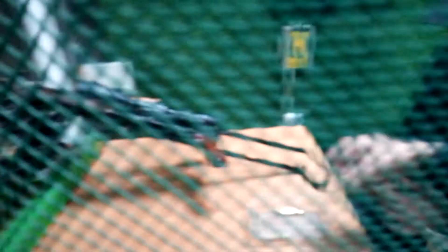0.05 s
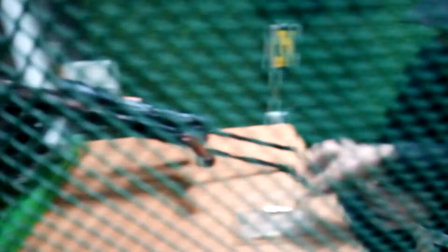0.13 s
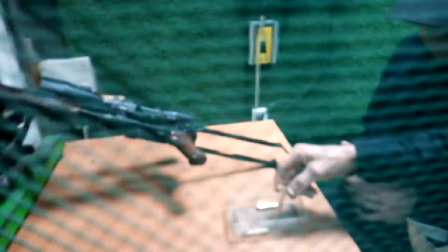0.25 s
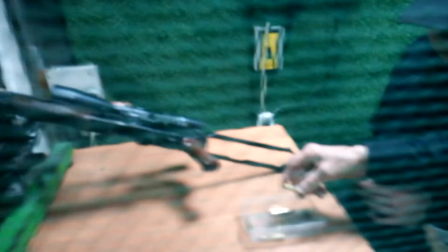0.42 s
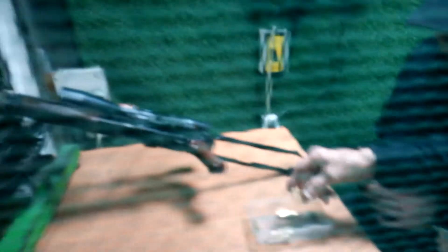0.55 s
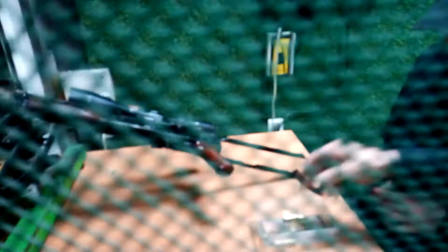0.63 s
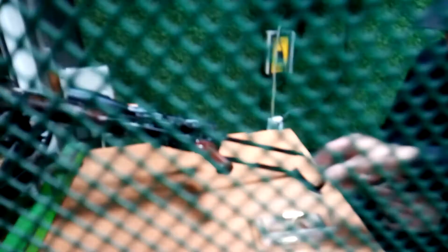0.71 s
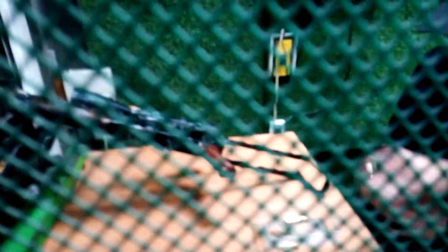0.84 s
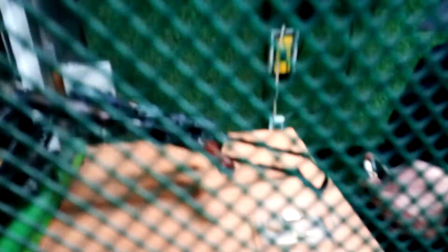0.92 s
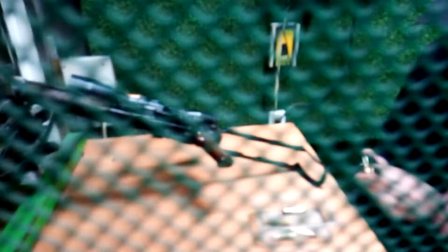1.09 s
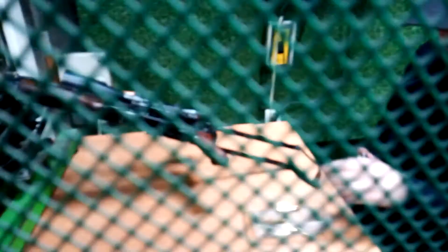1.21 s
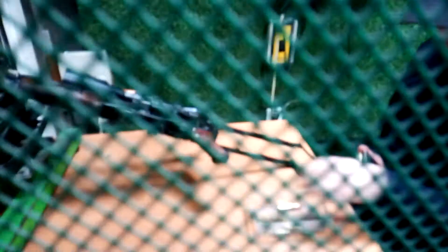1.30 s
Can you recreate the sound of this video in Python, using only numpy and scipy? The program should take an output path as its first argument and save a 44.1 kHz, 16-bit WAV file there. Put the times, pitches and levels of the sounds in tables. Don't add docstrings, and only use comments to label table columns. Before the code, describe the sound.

Small brass cartridge cases clink and rattle as a hand gathers them from a plastic tray

```python
import sys
import numpy as np
from scipy import signal
from scipy.fft import rfft, irfft
from scipy.io import wavfile

SR = 44100
rng = np.random.default_rng(int(sys.argv[2]) if len(sys.argv) > 2 else 0)


def volts(x):
    e = np.asarray(x, float) / 20
    return 10 ** e


def master_out(mix):
    frames = np.transpose(np.atleast_2d(mix))
    ceiling = np.clip(frames, -1, 1)
    pcm = np.round(ceiling * 32767).astype(np.int16)
    wavfile.write(sys.argv[1], SR, pcm)


N = 59535


def strikes(s, db):
    x = np.zeros(N)
    index = np.minimum((np.asarray(s) * SR).astype(int), N - 1)
    np.add.at(x, index, volts(db))
    return x


def ring(clicks, hz, t60_s):
    radius = volts(-60 / (t60_s * SR))
    w = 2 * np.pi * hz / SR
    return signal.lfilter([0, np.sin(w)], [1, -2 * radius * np.cos(w), radius ** 2], clicks + 1e-18)


CONTACT_S, SPREAD_DB, FIRST_TOUCH_DB = 0.0004, 3.5, -23.5


def body(s, db, modes):
    chance_db = SPREAD_DB * rng.standard_normal((len(s), 2, len(modes)))
    out = 0
    for k, (hz, level_db, t60_s) in enumerate(modes):
        first = strikes(s - CONTACT_S, db + level_db + FIRST_TOUCH_DB + chance_db[:, 0, k])
        second = strikes(s + CONTACT_S, db + level_db + chance_db[:, 1, k])
        out = out + (-1) ** k * ring(first + second, hz, t60_s)
    return out


# t/s, crack peak/dB, table level/dB, tray level/dB
KNOCKS = [(0.22,-6.5,-28,-19.5), (0.3417,-9,-34,-31.5), (0.4256,-16.5,-44.5,-33), (0.4506,-9.5,-25,-17.5),
          (.475,-27,-38,-34), (.5005,-19.5,-35.5,-28.5), (0.5107,-39,-39.5,-61), (0.5159,-18,-33,-47),
          (.537,-30,-60,-31.5), (0.5529,-26,-60,-47), (0.5864,-7,-29,-20.5), (0.594,-18,-29,-23),
          (0.594,-9,-34,-54), (.604,-18,-62,-52), (0.6452,-18,-34.5,-27), (.662,-30,-69,-57),
          (0.677,-25.5,-73,-37), (.690,-30,-67,-64), (0.7282,-18,-54,-41), (0.7347,-32,-40,-43),
          (0.737,-45,-45.5,-26), (.759,-36,-74,-70), (0.7726,-10.5,-26,-24.5), (.844,-25.5,-46,-53),
          (.864,-40,-50,-59), (.885,-27.5,-44,-37.5), (1.011,-18,-39,-33.5), (1.277,-51,-53,-47.5),
          (1.296,-48.5,-74,-54), (1.334,-33,-47.5,-40)]
# f/Hz, level/dB, t60/s
CRACK_MODES = [(2850, -19.5, 0.0024), (3606, -12, 0.0054), (4330, -8, 0.0055), (5600, -16.5, 0.016),
               (5660, -4.5, 0.0043), (6436, -3, 0.0054), (7330, -10.5, 0.0053), (9620, -14.5, 0.0052),
               (11700, -18.5, 0.0012), (14800, -21, 0.0041)]
# f/Hz, level/dB, t60/s
TRAY_MODES = [(1454, -13, 0.045), (1767, -0.5, 0.027), (1863, 4, 0.021), (1918, 6, 0.014),
              (2046, 4.5, 0.016), (2240, -5, 0.003), (2525, -13, 0.033)]
# f/Hz, level/dB, t60/s
TABLE_MODES = [(145, -23.5, 0.11), (330, -14.5, 0.066), (508.6, -5.5, 0.056), (543, -4, 0.019),
               (712.6, -7, 0.083), (883, -2.5, 0.048), (1032, -7.5, 0.042), (1270, -35, 0.019)]


def knocks():
    s, crack_db, table_db, tray_db = np.transpose(KNOCKS)
    crack = body(s, crack_db, CRACK_MODES)
    tray = body(s, tray_db, TRAY_MODES)
    return crack + tray + body(s, table_db, TABLE_MODES)


# t/s, level/dB
RIM_HITS = [
    (0.2205, -18.5),
    (0.3418, -20.5),
    (0.5015, -20.5),
    (0.5167, -22),
    (.596, -20.5),
    (0.7348, -19),
    (.738, -24),
]
# f/Hz, level/dB, t60/s
RIM_MODES = [(1937, -4, 0.014), (2062, -3, 0.02), (4050, -10, 0.026)]


def rim():
    s, db = np.transpose(RIM_HITS)
    return sum(ring(strikes(s, db + level_db), hz, t60_s) for hz, level_db, t60_s in RIM_MODES)


# t/s, f/Hz, level/dB, t60/s
SPOTS = [(.2205, 1035, -35.5, 0.035), (.2205, 1500, -33, 0.16), (.2205, 700, -41, 0.045),
         (.4256, 2010, -23.5, 0.016), (.5304, 7400, -26, 0.0092), (.5532, 7340, -20, .012),
         (.5582, 6000, -24.5, 0.026), (.8212, 5880, -21, 0.012), (.3417, 4230, -21.5, 0.014),
         (.2205, 308, -42.5, 0.32), (.2202, 6500, -10, .008), (.2205, 2185, -21.5, .03),
         (.587, 9700, -11.5, 0.0091), (.773, 6340, -13, 0.0083), (.451, 3040, -17.5, 0.014),
         (1.011, 6070, -24, 0.0096), (.451, 563, -30.5, 0.22), (.451, 1030, -47, 0.015),
         (.451, 1270, -26, 0.052), (.516, 990, -25, 0.024), (.587, 881, -30.5, 0.095),
         (.594, 1480, -48, 0.083), (.7349, 4310, -23, 0.019), (.738, 4260, -27.5, 0.012),
         (.773, 572, -34.5, 0.16), (.773, 883, -38, 0.076), (1.011, 494, -46.5, 0.22),
         (1.011, 696, -33, 0.024), (1.011, 880, -49, 0.24), (1.011, 1453, -37, 0.058),
         (1.011, 2525, -43.5, 0.077), (1.334, 2110, -34, 0.032)]


def spots():
    modes = rim()
    for k, (s, hz, db, t60_s) in enumerate(SPOTS):
        modes = modes + (-1) ** k * ring(strikes([s], db), hz, t60_s)
    low_cut = signal.butter(2, 300, "high", fs=SR, output="sos")
    return signal.sosfilt(low_cut, modes)


def rms_one(x):
    return x / np.sqrt(np.mean(x ** 2) + 1e-20)


def flutter(hz):
    r = np.exp(-2 * np.pi * hz / SR)
    return rms_one(signal.lfilter([1], [1, -2 * r, r * r], rng.standard_normal(N)))


def tumble():
    return 1 + 0.25 * flutter(hz=80)


def halo():
    return flutter(hz=450)


def swell(at_s, db, hz, t60_s, rise_s):
    t = np.maximum(np.arange(N) / SR - at_s, 0)
    decay = volts(db - 60 * np.minimum(t / t60_s, 3))
    return decay * (1 - np.exp(-t / rise_s)) * np.sin(2 * np.pi * hz * t)


# t/s, loss/dB
GRIPS = [(.489, 8), (0.5018, 8), (0.513, 3), (.539, 10), (0.5606, 9.5), (.577, 2), (0.607, 1), (0.733, 13),
         (.748, -6), (.800, 4.5), (0.81, 10), (.827, 4), (.853, 12.5)]
GRIP_S = 0.0015


def gripped(at_s):
    t = np.arange(N) / SR
    loss_db = np.zeros(N)
    for s, touch_db in GRIPS:
        if s > at_s + GRIP_S:
            loss_db += max(touch_db, 0) * np.clip((t - s) / GRIP_S, 0, 1)
    return volts(-loss_db)


# t/s, peak/dB, ring f/Hz, upper mode level/dB, t60/s
CLINKS = [(0.452,-27,8650,-31,0.79), (0.4903,-15.5,8675,-55,0.24), (.5095,-46,8700,-60,0.032),
          (0.532,-64,8490,-60,0.064), (0.557,-17,8550,-46,0.077), (0.596,-17,8660,-37,0.06),
          (.666,-31,8540,-56,0.042), (0.7282,-24.5,8600,-31.5,0.08), (0.7344,-23,8590,-35,0.055),
          (0.773,-17.5,8664,-24,0.24), (0.8211,-18,8540,-39,0.17), (.882,-33.5,8580,-69,0.035),
          (0.945,-31.5,8540,-80,0.011), (1.0853,-43.5,8520,-75,0.024), (1.265,-48,8420,-95,0.016),
          (1.278,-35,8300,-78,0.02), (1.334,-30.5,8740,-59,0.048)]
# t/s, peak/dB, ring f/Hz, t60/s
PARTNERS = [
    (.4903, -24, 8680, 0.065),
    (.531, -24, 8500, 0.094),
    (0.5575, -24, 8810, 0.054),
    (.597, -26, 8440, 0.13),
    (.7276, -17.5, 8410, 0.038),
    (.7731, -16.5, 8580, 0.083),
    (.7741, -27, 8200, .04),
    (0.8226, -18.5, 8580, 0.03),
    (.8209, -25, 8100, .03),
    (0.944, -42, 8640, 0.073),
]
UPPER_HZ, UPPER_SPLIT_HZ, UPPER_T60_S, UPPER_RISE_S = 14430, 70, 0.11, 1e-4
UPPER_FLOOR_DB = -58
RING_RISE_S = 0.00029
TICK_DB, TICK_TRAY_DB = -4.5, -22
HALO_SHARE, UPPER_HALO_SHARE = 0.16, 0.45


def clinks():
    s, db, _, _, _ = np.transpose(CLINKS)
    tick = body(s, db + TICK_DB, CRACK_MODES) + body(s, db + TICK_TRAY_DB, TRAY_MODES)
    first, second, upper = 0, 0, 0
    for at_s, peak_db, hz, upper_db, t60_s in CLINKS:
        grip = gripped(at_s)
        first = first + grip * swell(at_s, peak_db, hz, t60_s, RING_RISE_S)
        if upper_db > UPPER_FLOOR_DB:
            pair = swell(at_s, upper_db, UPPER_HZ, UPPER_T60_S, UPPER_RISE_S)
            pair += swell(at_s, upper_db - 4, UPPER_HZ + UPPER_SPLIT_HZ, UPPER_T60_S, UPPER_RISE_S)
            brief = swell(at_s, upper_db - 9, 14800, 0.03, UPPER_RISE_S)
            upper = upper + grip * (pair + brief)
    for partner_s, peak_db, hz, t60_s in PARTNERS:
        at_s = s[np.argmin(abs(s - partner_s))]
        second = second + gripped(at_s) * swell(at_s, peak_db, hz, t60_s, RING_RISE_S)
    upper = upper * (tumble() + UPPER_HALO_SHARE * halo())
    first = first * (tumble() + HALO_SHARE * halo())
    return tick + upper + first + second * tumble()


# t/s, peak/dB
TAPS = [
    (.780, -40),
    (.7935, -40),
    (.800, -43),
    (.8065, -44),
    (.8165, -43),
    (.822, -37),
    (.862, -43),
]
# t/s, peak/dB
TICKS = [(.4585, -27), (.496, -33), (.5304, -31), (.5442, -38), (.5582, -30), (.5645, -33), (.6057, -30),
         (.7372, -26), (.786, -35), (.7944, -31), (.832, -34), (.8384, -34), (.8515, -35)]


def settling():
    tap_s, tap_db = np.transpose(TAPS)
    tick_s, tick_db = np.transpose(TICKS)
    return body(tap_s, tap_db - 3, TRAY_MODES) + body(tick_s, tick_db, CRACK_MODES)


# start t/s, end t/s, level/dB
CHATTER = [
    (0.452, .58, -52),
    (0.599, .71, -44),
    (0.733, 0.774, -57),
    (0.778, 0.902, -45),
    (0.893, 1.0, -56.5),
]
CHATTER_PER_S, CHATTER_SPAN_S, CHATTER_FADE_DB_PER_S = 260, 0.2, 50
CHATTER_CRACK_DB, CHATTER_TABLE_DB = -3, -5


def chatter():
    out = 0
    count = int(CHATTER_PER_S * CHATTER_SPAN_S)
    for start_s, end_s, start_db in CHATTER:
        after_s = rng.uniform(0, CHATTER_SPAN_S, count)
        s = start_s + after_s
        db = start_db - CHATTER_FADE_DB_PER_S * after_s + rng.normal(0, 3, count)
        db = np.where(s < end_s, db, -200)
        out = out + body(s, db, TRAY_MODES)
        out = out + body(s, db + CHATTER_CRACK_DB, CRACK_MODES)
        out = out + body(s, db + CHATTER_TABLE_DB, TABLE_MODES)
    return out


# t/s, level/dB, f/Hz
THUDS = [
    (0.225, -30.5, 96),
    (0.36, -34.5, 93.8),
    (0.457, -31, 99.5),
    (.52, -34, 92),
    (0.59, -25.5, 98),
    (0.733, -41, 91.5),
    (0.788, -35.5, 102.5),
]


def thuds():
    return sum(swell(s, db, hz, t60_s=0.17, rise_s=0.025) for s, db, hz in THUDS)


def at_hz(points, hz, axis=1):
    p = np.array(points)
    return np.interp(np.log(np.maximum(hz, 1)), np.log(p[:, 0]), p[:, axis])


def rise(x, rise_s):
    r = np.exp(-1 / (rise_s * SR))
    return signal.lfilter([1 - r], [1, -r], x)


# f/Hz, level/dB, t60/s
BOOTH = [(200, -22.5, 0.23), (660, -10, 0.11), (1950, -17.5, 0.11), (2740, -32, 0.059),
         (6150, -23.5, 0.083), (9700, -26, 0.057), (12100, -51, 0.04), (15500, -34, 0.081)]
BRASS_SCATTER_DB = -3


def booth():
    s, crack_db, table_db, tray_db = np.transpose(KNOCKS)
    clink_s, clink_db, _, _, _ = np.transpose(CLINKS)
    table, tray = strikes(s, table_db), strikes(s, tray_db)
    bright = strikes(s, crack_db) + strikes(clink_s, clink_db + BRASS_SCATTER_DB)
    edges_hz = 140 * 2 ** np.arange(0, 7.1, 0.5)
    white = rng.standard_normal((2, N))
    out = 0
    for k, (low_hz, high_hz) in enumerate(zip(edges_hz, edges_hz[1:])):
        hz = np.sqrt(low_hz * high_hz)
        blows = table if hz < 1300 else tray if hz < 2500 else bright
        decay = volts(-60 / (at_hz(BOOTH, hz, axis=2) * SR))
        envelope = rise(signal.lfilter([1], [1, -decay], blows + 1e-18), 5.1 / hz)
        band = signal.butter(2, [low_hz, high_hz], "band", fs=SR, output="sos")
        noise = rms_one(signal.sosfilt(band, white[k % 2]))
        out = out + volts(at_hz(BOOTH, hz)) * envelope * noise
    return out


def coloured(x, spectrum):
    gain = volts(at_hz(spectrum, np.fft.rfftfreq(N, 1 / SR)))
    return rms_one(irfft(rfft(x) * gain, N))


# f/Hz, width/Hz, level/dB
HOUSING = [(2130, 470, 1), (3940, 2100, 4.5), (6000, 1300, 13), (9340, 4400, 2)]


def housing(x):
    out = x
    for hz, width_hz, db in HOUSING:
        r = np.exp(-np.pi * width_hz / SR)
        b = [(1 - r * r) / 2, 0, -(1 - r * r) / 2]
        a = [1, -2 * r * np.cos(2 * np.pi * hz / SR), r * r]
        out = out + volts(db) * signal.lfilter(b, a, signal.lfilter(b, a, x))
    return rms_one(out)


# t/s, level/dB
HANDLING = [(0.219, -42), (0.278, -46.5), (0.303, -38.5), (.39, -40.5), (.44, -52), (0.619, -55),
            (.72, -50.5), (.88, -64), (.96, -53.5), (1.0, -50.5), (1.07, -62), (1.16, -53.5), (1.25, -60),
            (1.35, -54)]
# f/Hz, level per Hz/dB
RUSTLE = [(80, 0.5), (900, 9.5), (2800, 5), (6000, 2.5), (10000, -2.5), (12500, -15.5), (15200, -4),
          (16500, -14)]
# start, up, peak, end t/s
SWISH_S = (1.08, 1.1, 1.135, 1.165)
SWISH_DB, SWISH_START_SHARE = -40.5, 0.57
GRAINS_PER_S, GRAIN_DB = 9000, -5


def rustle():
    s, db = np.transpose(HANDLING)
    t = np.arange(N) / SR
    grains = (rng.random(N) < GRAINS_PER_S / SR) * rng.standard_normal(N) * rng.exponential(1, N)
    hand = (t > KNOCKS[0][0]) * volts(np.interp(t, s, db))
    sleeve = volts(SWISH_DB) * np.interp(t, SWISH_S, [0, SWISH_START_SHARE, 1, 0])
    hiss = coloured(rng.standard_normal(N) + volts(GRAIN_DB) * rms_one(grains), RUSTLE)
    return (hand + sleeve) * (hiss + housing(hiss)) / 2


# f/Hz, level per Hz/dB
AIR = [(25, -5.5), (160, -8.5), (1400, -23.5), (2800, -17.5), (5000, -26.5), (9500, -34), (12500, -46),
       (15200, -33)]
# t/s, level/dB
AIR_SWELL = [
    (0, 0),
    (.09, -0.5),
    (.12, 2.5),
    (.2, 3.5),
    (1.35, -3.5),
]
AIR_DB = -61.5


def air():
    s, db = np.transpose(AIR_SWELL)
    level = volts(AIR_DB + np.interp(np.arange(N) / SR, s, db))
    return level * housing(coloured(rng.standard_normal(N), AIR))


def scene():
    hits = knocks() + spots() + settling() + clinks() + chatter() + thuds()
    return (hits + booth() + rustle() + air())[None]


def band_limit(x):
    return signal.sosfilt(signal.butter(12, 16800, fs=SR, output="sos"), x)


PEAK_LIMIT, LOW_CUT_HZ, HIGH_CUT_HZ = 0.42, 45, 15600


def record(dry):
    low_cut = signal.butter(2, LOW_CUT_HZ, "high", fs=SR, output="sos")
    high_cut = signal.butter(16, HIGH_CUT_HZ, fs=SR, output="sos")
    x = PEAK_LIMIT * np.tanh(dry / PEAK_LIMIT)
    x = signal.sosfilt(high_cut, signal.sosfilt(low_cut, x))
    return band_limit(x)


dry = scene()
out = record(dry)
master_out(out)
```